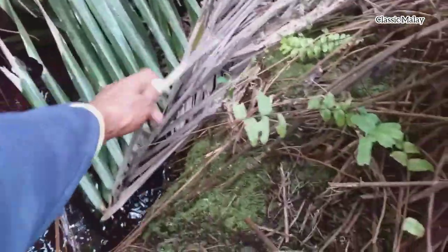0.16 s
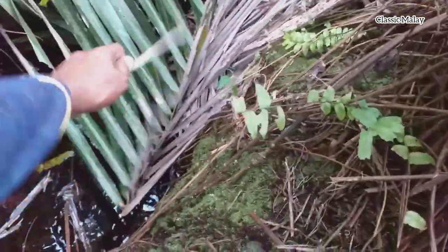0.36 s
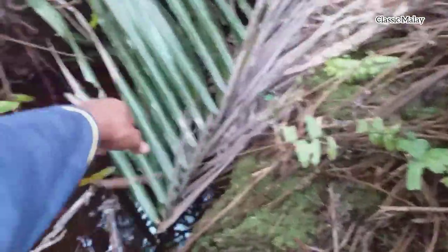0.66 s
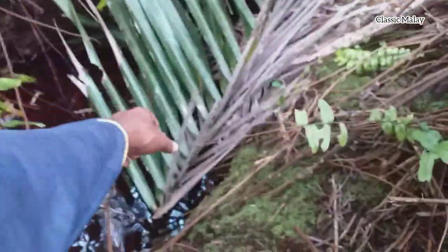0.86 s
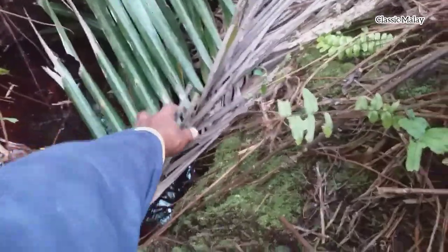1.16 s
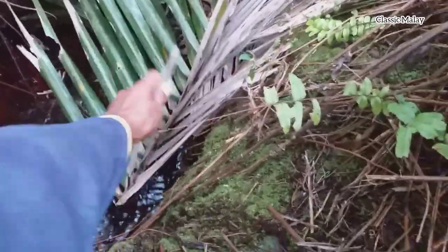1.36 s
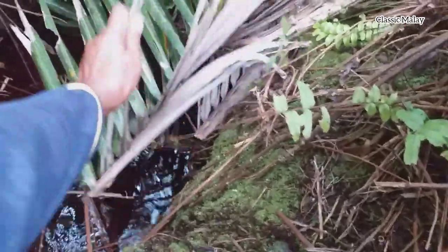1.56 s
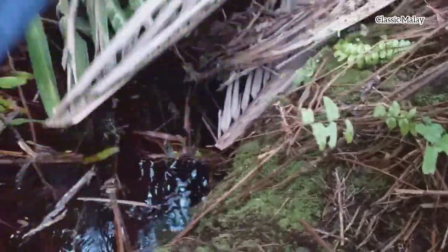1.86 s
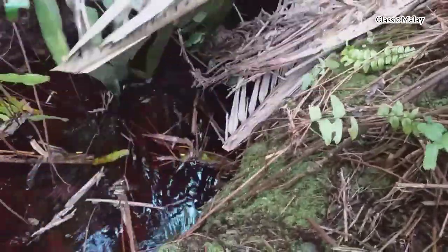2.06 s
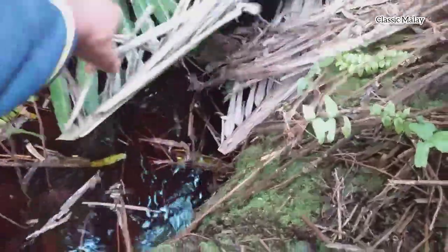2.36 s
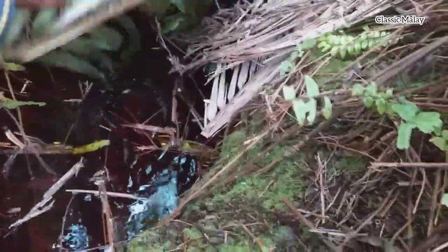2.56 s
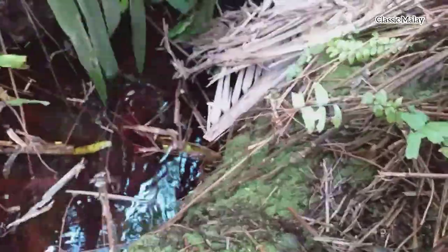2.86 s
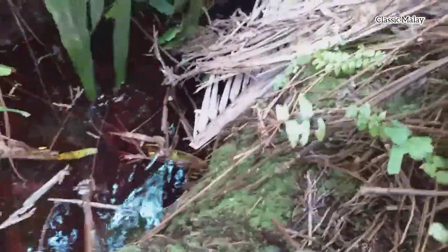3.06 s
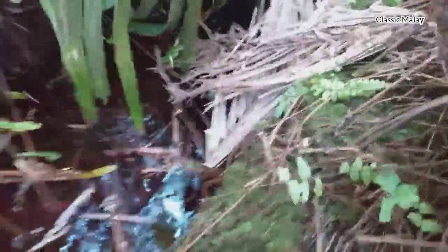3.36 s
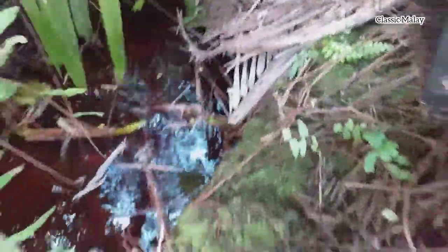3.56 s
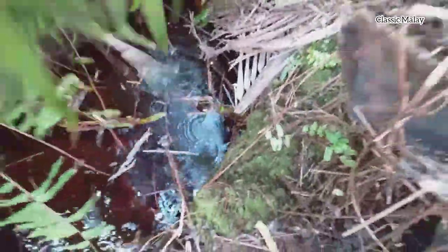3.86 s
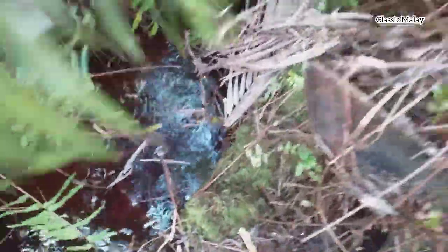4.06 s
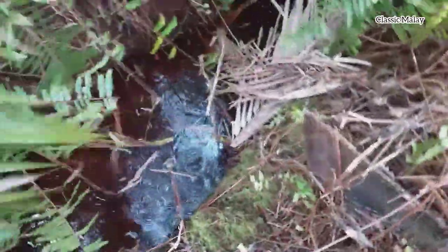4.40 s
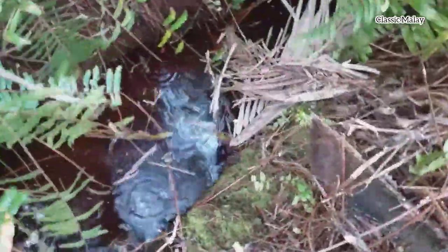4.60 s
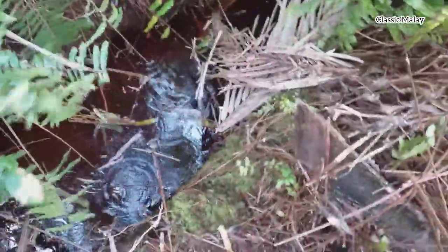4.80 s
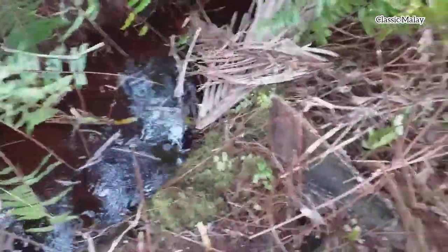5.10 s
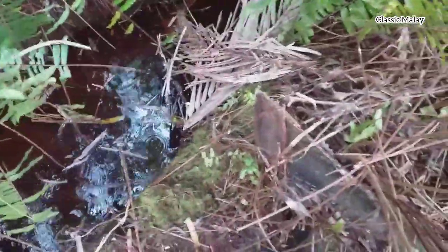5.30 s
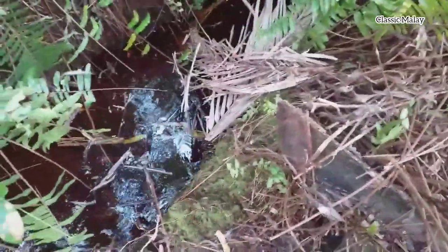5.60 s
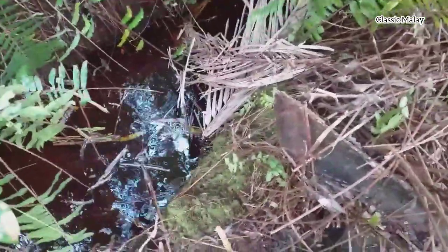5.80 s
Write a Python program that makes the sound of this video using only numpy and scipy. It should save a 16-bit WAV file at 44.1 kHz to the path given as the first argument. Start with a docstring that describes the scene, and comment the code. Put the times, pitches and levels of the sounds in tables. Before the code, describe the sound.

Brittle crackling and sharp snaps from a tugged dry frond, two dull thuds, a quiet pause, then dense leafy rustling with twig ticks outdoors.

```python
"""A palm frond is pulled by hand off a fish trap in a ditch: dry leaflets crinkle by stick-slip and snap as
decaying noise with short resonances, and the stalk thuds twice as damped low sines with hollow knocks.
The frond is then swept through ferns on the bank: dense random contacts merge into a long rustle, with
a few twig ticks and dull stalk scrapes, each a broad resonance. The open air is quiet, shaped noise with
a faint, steady band of insects; one close microphone filters the sum."""
import sys
import numpy as np
from scipy import signal
from scipy.fft import rfft, irfft, next_fast_len
from scipy.io import wavfile

SR = 44100
rng = np.random.default_rng(int(sys.argv[2]) if len(sys.argv) > 2 else 0)


def to_wav(s):
    """Save 16-bit WAV."""
    ch = np.atleast_2d(s).T  # columns
    pcm = np.round(np.clip(ch, -1, 1) * 32767)  # PCM
    wavfile.write(sys.argv[1], SR, pcm.astype(np.int16))


N = 262020
TIME = np.arange(N) / SR

# quiet outdoor background, relative spectrum: frequency_hz, density_db
AIR_COLOUR = [(15, -31), (25, -13), (43, -8), (105, 3.5), (641, -29), (1190, -10), (2550, -5.5),
              (2840, -16), (3720, -20), (4600, -10), (7110, -4), (9320, -19), (13600, -4.5), (16000, -9)]
AIR_DB = -68  # mean level, about which it wavers
# a faint, steady chorus of insects: centre_hz, width_hz, level_db
INSECTS = (7250, 330, -72)
# twigs and ribs tapping: start_s, peak_level_db, pitch_hz
TWIG_TAPS = [(0.186, -37, 410), (0.983, -44, 1620), (2.417, -36, 1400), (4.176, -16.5, 4800),
             (4.4252, -12.5, 5200), (4.438, -16, 1770), (4.611, -15.5, 2430), (4.819, -21.5, 3060),
             (4.894, -20.5, 5060), (4.965, -21, 4600), (5.4215, -23.5, 1980), (5.886, -29, 6300),
             (5.907, -29, 6140)]
# the stalk scraping with a dull, hollow sound: centre_s, level_db, length_s (to 1/e on either side), pitch_hz
STALK_SCRAPES = [(0.03, -57, 0.067, 500), (0.22, -53, .035, 430), (1.02, -70, .1, 378),
                 (1.729, -51.5, 0.027, 229), (3.313, -56.5, .05, 300), (5.548, -49, .035, 480)]
# the stalk knocking free: start_s, swing_level_db, pitch_hz, hollow_knock_db
STALK_THUDS = [(1.905, -28, 65, -34.5), (2.068, -38, 75, -36.5)]

# force of the frond brushing through the ferns, as the level of the leaves: time_s, level_db
SWEEP_FORCE = [(3.22, -53), (3.3, -45), (3.42, -42.5), (3.54, -38), (3.73, -39), (3.94, -36), (4.03, -39.5),
               (4.13, -33), (4.3, -34), (4.43, -29.5), (4.72, -36), (4.82, -39.5), (5.04, -41.5),
               (5.32, -46), (5.55, -39), (5.69, -44), (5.83, -51), (5.93, -48)]
# filter for fern contacts: frequency_hz, gain_db
SWEEP_COLOUR = [(35, -48), (60, -15), (315, -10), (579, -9), (803, -8), (1250, -7), (1680, -3.1),
                (2400, -6.3), (3850, -4.5), (4970, -0.5), (7940, -3), (9350, -6.5), (14900, -8),
                (16000, -7.5)]
# the fern leaves that rub most: time_s, resonance_hz
FERN_PITCH = [(3.2, 4670), (3.55, 7300), (3.95, 7450), (4.15, 5400), (4.5, 5700), (4.9, 5200), (5.35, 5050),
              (5.55, 6900), (5.9, 6400)]
SWEEP_START_S, SWAY_DB = 3.15, -67.5  # the frond enters the ferns; low rumble of the swaying plants
STALK_RUB_DB, TIP_HISS_DB = -5.7, 2  # stalk and fine tips, relative to the leaves, until the ferns settle
# the ferns spring back: change of hiss and of rubbing
SETTLE_S, SETTLE_HISS_DB, SETTLE_RUB_DB = 4.78, -2, -1
REST_S, REST_RUB_DB_PER_S = 5.55, 14  # the stalk comes to rest and its rubbing fades

# tugs of the hand, each swelling and dying away: peak_s, level_db, rise_db_per_s, fall_db_per_s,
# rib_db (rubbing ribs relative to the leaflets)
TUGS = [(0.12, -41, 25, 44, -7), (0.88, -61, 98, 50, -9.5), (1.34, -45.5, 135, 9, -11.5),
        (1.8, -37.5, 43, 50, -10), (2.28, -42.5, 70, 280, -18.5), (2.63, -57.5, 120, 65, -15),
        (3.03, -54.5, 240, 40, -15), (3.22, -48, 80, 50, -6)]
# filter for leaflet contacts: frequency_hz, gain_db
PULL_COLOUR = [(88, -72), (150, -9), (504, -15), (774, -9.5), (1210, -8), (1500, -2.5), (2100, -12.5),
               (3100, -7), (4410, -3), (5050, -3), (6140, -5.5), (7770, -2), (8900, -8), (15100, -4),
               (16000, -12)]
HOLD_DB = -69  # leaflets stirring between tugs
# rumble relative to the rubbing ribs; steady rumble of the frond against the trap
RUMBLE_DB, TRAP_DB = -14, -76.5
FREE_S, FREE_DROP_DB = 2.44, -10.5  # the frond leaves the trap and both rumbles drop

# dry leaflets snapping: start_s, level_db (before SNAP_GAIN_DB), resonance_hz, crack_t60_s
LEAFLET_SNAPS = [(0.0548, -16.5, 7740, .022), (0.087, -5, 7150, .017), (0.105, -2, 6740, 0.011),
                 (0.112, -9.5, 6800, 0.019), (0.177, -7, 3700, 0.08), (0.190, -3, 8500, 0.015),
                 (0.212, -18, 3970, .051), (0.251, -18.5, 7780, .06), (0.411, -14.5, 6900, .04),
                 (0.51, -26, 8450, .027), (0.528, -25, 6150, .022), (0.594, -32, 5780, 0.033),
                 (0.664, -34, 4910, .025), (0.707, -23.5, 6960, 0.088), (0.749, -29.5, 7100, .031),
                 (1.2107, -20.5, 4700, .034), (1.304, -25, 4580, 0.032), (1.32, -17, 5800, 0.027),
                 (1.428, -5, 5100, 0.019), (1.4805, -19.5, 7360, .035), (1.531, -5, 8000, .031),
                 (1.6453, -0.5, 7000, 0.02), (1.693, -6.5, 7700, 0.067), (1.702, -4.5, 7150, .067),
                 (1.7128, -7.5, 5500, 0.048), (1.7567, -6, 5290, 0.088), (1.763, -7.5, 5130, .02),
                 (1.7904, -8, 7650, .029), (1.8155, -8, 4440, 0.023), (1.902, -4.5, 7400, 0.015),
                 (1.9104, -9.5, 6500, 0.066), (1.945, -17.5, 6560, .025), (2.04, -14.5, 8000, 0.058),
                 (2.0672, 4, 4200, 0.028), (2.105, -19.5, 7870, .025), (2.151, -8.5, 6800, 0.052),
                 (2.351, -20, 4800, 0.028), (2.38, -24, 7540, 0.022), (2.417, -20, 5010, 0.024),
                 (2.4627, -13, 5660, .035), (2.65, -18.5, 4400, 0.084), (2.724, -25.5, 7500, .056),
                 (2.779, -35, 6460, .02), (2.85, -32.5, 3680, 0.023), (2.876, -32.5, 5630, .025),
                 (2.973, -28.5, 6700, .014), (2.988, -24.5, 5000, 0.13), (3.037, -29, 4340, .02),
                 (3.161, -27, 8440, .015), (3.17, -20, 8100, .05), (3.278, -16.5, 2820, 0.056),
                 (3.389, -14.5, 8010, 0.036), (5.147, -17.5, 6370, 0.038), (5.193, -11.5, 5000, 0.027),
                 (5.736, -23.5, 7190, .025)]
# filter for the cracks: frequency_hz, gain_db
SNAP_COLOUR = [(120, -16), (200, -17.5), (440, -30), (760, -18.5), (1450, -19.5), (2610, -9.5), (4430, 3),
               (5230, 3), (7970, 2), (9400, -1.5), (10100, 1.5), (11100, -1), (12600, 1), (16000, -4)]
SNAP_GAIN_DB = 8  # common gain of all snaps and lesser cracks
# woody ring of the rib under a 0 dB snap; it grows more slowly than the crack, so soft snaps sound woodier
RIB_DB, RIB_DB_PER_DB = -23.5, .69
# lesser cracks while the frond is handled: level over the sliding leaflets before SNAP_GAIN_DB, and spread
CRACKS_PER_S, CRACK_DB, CRACK_SPREAD_DB, CRACK_T60_S = 14, 13, 5, .018

# microphone resonances: centre_hz, width_hz, gain_db
MIC_PORT = [(1760, 290, 1.5), (5460, 480, -0.5), (7930, 610, 4.5), (9070, 2660, -5), (15000, 1000, 3.5)]
BASS_CUT_HZ, TOP_HZ = 42, 15750


def undb(db):
    """Convert decibels to an amplitude ratio: 20 dB per factor of ten."""
    return np.exp(np.asarray(db) * (np.log(10) / 20))


def unit(x):
    """Normalise the mean power, giving an rms of 1."""
    return x / np.sqrt(np.mean(x ** 2) + 1e-18)


def curves(table):
    """Interpolate each column linearly against the first, which is time."""
    s, *columns = np.transpose(table)
    return [np.interp(TIME, s, column) for column in columns]


def after(s, ramp_s):
    """Linear transition from 0 to 1, centred on a moment."""
    return np.clip((TIME - s) / ramp_s + .5, 0, 1)


def walk(rate):
    """Random modulation: normal values of spread 1, rate per second, joined by straight lines."""
    knots = rng.standard_normal(8192)
    return np.interp(TIME * rate, np.arange(len(knots)), knots)


def band(x, lo_hz, hi_hz):
    """Band-pass by the difference of two soft low-passes, so that neighbouring bands add up flat."""
    size = next_fast_len(len(x), True)
    hz6 = (np.arange(size // 2 + 1) * SR / size) ** 6
    below_hi = 1 / (1 + hz6 / float(hi_hz) ** 6)
    below_lo = 1 / (1 + hz6 / float(lo_hz) ** 6)
    return irfft(rfft(x, size) * (below_hi - below_lo), size)[:len(x)]


def ring(x, hz, width_hz):
    """A single damped resonator, of gain 1 at its centre."""
    b, a = signal.iirpeak(hz, hz / width_hz, fs=SR)
    return signal.lfilter(b, a, x)


def colour(x, points, size=2048):
    """Minimum-phase filter: the folded cepstrum makes a magnitude curve causal."""
    hz, db = np.transpose(points)
    grid = np.maximum(np.arange(size // 2 + 1) * SR / size, 1)
    magnitude = undb(np.interp(np.log(grid), np.log(hz), db))
    cepstrum = irfft(np.log(magnitude))
    cepstrum[1:size // 2] *= 2
    cepstrum[size // 2 + 1:] = 0
    impulse = irfft(np.exp(rfft(cepstrum)))
    return signal.fftconvolve(x, impulse)[:len(x)]


def grains(rate, spread_db, cap_db):
    """Random impulses with exponentially spread levels: many faint contacts, a few strong ones."""
    place, strength, side = rng.random((3, int(rate * N / SR)))
    level_db = np.minimum(-spread_db * np.log1p(-strength), cap_db)
    push = undb(level_db) * np.sign(side - .5)
    return unit(np.bincount((place * N).astype(int), push, N))


def scatter(x, t60, tail_db):
    """Energy decay: each contact shakes the neighbouring leaves, whose hiss dies away exponentially."""
    keep = 1e-6 ** (1 / (t60 * SR))
    energy = signal.lfilter([1 - keep], [1, -keep], x ** 2)
    return x + undb(tail_db) * np.sqrt(energy) * rng.standard_normal(N)


def crinkle(rate, spread_db, cap_db, leaf_db, flutter_db, count=6):
    """Impact excitation: broad ticks plus leaflets of many sizes, each ringing at its own pitch in bursts."""
    leaves = 0
    for hz in np.geomspace(1200, 14000, count):
        contacts = grains(rate / count, spread_db, cap_db) * undb(flutter_db * walk(70))
        leaves = leaves + ring(contacts, hz, hz / 2.5)
    ticks = grains(rate, spread_db, cap_db)
    return unit(ticks + undb(leaf_db) * unit(leaves))


def shimmer(x, flicker_db, centre_hz, lift_db, count=10):
    """Independent band modulation: each leaf size flickers, and the size that rubs most lifts its own pitch."""
    edges = np.concatenate([[1], np.geomspace(1100, 13000, count), [SR]])
    out = 0
    for lo, hi in zip(edges, edges[1:]):
        octaves = np.log2(np.sqrt(lo * hi) / centre_hz)
        nearness = np.exp(-(octaves / 0.23) ** 2)
        out = out + band(x, lo, hi) * undb(flicker_db * walk(90) + lift_db * nearness)
    return out


def air():
    """Broadband ambient noise, gently wavering, with a narrow band of noise for insects far off."""
    hz, width_hz, db = INSECTS
    chorus = ring(ring(rng.standard_normal(N), hz, width_hz), hz, width_hz)
    background = unit(colour(rng.standard_normal(N), AIR_COLOUR))
    return unit(chorus) * undb(db) + background * undb(AIR_DB + walk(3.7))


def twigs(size=1500):
    """Heavily damped resonance: a short burst of noise drives one broad, woody ring."""
    out, t = np.zeros(N + size), np.arange(size) / SR
    for s, db, hz in TWIG_TAPS:
        push = rng.standard_normal(size) * undb(-60 * t / 0.014)
        tap = ring(ring(push, hz, .8 * hz), hz, .8 * hz)
        start = int(s * SR)
        out[start:start + size] += undb(db) * tap / np.abs(tap).max()
    return out[:N]


def scrapes():
    """Friction excitation: the rough skin of the dragged stalk shakes one low, broad resonance."""
    out = 0
    for s, db, length_s, hz in STALK_SCRAPES:
        rough_skin = grains(1500, 2.6, 12)
        body = ring(ring(rough_skin, hz, 1.7 * hz), hz, 1.7 * hz)
        out = out + unit(body) * undb(db) * np.exp(-((TIME - s) / length_s) ** 2)
    return out


def thuds():
    """Damped oscillation: the heavy stalk swings for a few cycles and knocks hollowly on the trap."""
    out = 0
    for s, db, hz, knock_db in STALK_THUDS:
        t = np.maximum(TIME - s, 0)
        swing = undb(db - 60 * t / 0.045) * np.sin(2 * np.pi * hz * t)
        hollow = unit(ring(band(rng.standard_normal(N), 80, 330), 140, 140))
        onset = np.minimum(t / 0.0013, 1)
        out = out + swing + hollow * undb(knock_db - 60 * t / 0.042) * onset
    return out


def sweep():
    """Dense random contacts: soft fern tips flick along the frond and merge into a grainy hiss."""
    force_db, = curves(SWEEP_FORCE)
    fern_hz, = curves(FERN_PITCH)
    contacts = scatter(crinkle(6000, 2.57, 13.5, 2.1, 3.1), t60=0.07, tail_db=0.5)
    rustle = colour(contacts * undb(0.43 * walk(70)), SWEEP_COLOUR)
    rustle = shimmer(rustle, 2.0, fern_hz, lift_db=3.0)
    leaves = unit(band(rustle, 2470, 6160))
    stalk = unit(band(rustle, 45, 2350)) * undb(STALK_RUB_DB + SETTLE_RUB_DB * after(SETTLE_S, .2))
    stalk = stalk * undb(-REST_RUB_DB_PER_S * np.maximum(TIME - REST_S, 0))
    hiss = unit(band(rustle, 7360, 19800)) * undb(TIP_HISS_DB + SETTLE_HISS_DB * after(SETTLE_S, 0.16))
    sway = unit(band(rng.standard_normal(N), 47, 480)) * undb(SWAY_DB)
    return ((leaves + stalk + hiss) * undb(force_db) + sway) * after(SWEEP_START_S, 0.11)


def effort():
    """Addition of powers: tugs join the stir of the held frond, giving leaflet and rib levels in dB."""
    leaves, ribs = undb(HOLD_DB) ** 2, 1e-18
    for s, db, rise, fall, rub_db in TUGS:
        drop_db = np.maximum(rise * (s - TIME), fall * (TIME - s))
        power = undb(db - drop_db) ** 2
        leaves = leaves + power
        ribs = ribs + power * undb(rub_db) ** 2
    return 10 * np.log10(leaves), 10 * np.log10(ribs)


def pull():
    """Stick-slip friction: stiff leaflets catch and slip, the ribs rub and the trap rumbles under them."""
    leaf_db, rib_db = effort()
    contacts = scatter(crinkle(700, 4.2, 16.5, 1.5, 4.0), t60=0.075, tail_db=2)
    rustle = colour(contacts * undb(2.34 * walk(45.06)), PULL_COLOUR)
    rustle = shimmer(rustle, 2.7, 4800, lift_db=.6)
    leaves = unit(band(rustle, 2450, 14800)) * undb(leaf_db)
    ribs = unit(band(rustle, 264, 2470)) * undb(rib_db)
    rumble = unit(band(rng.standard_normal(N), 67, 227)) * (undb(rib_db + RUMBLE_DB) + undb(TRAP_DB))
    rumble = rumble * undb(FREE_DROP_DB * after(FREE_S, 0.45))
    return (leaves + ribs + rumble) * (1 - after(SWEEP_START_S, 0.086))


def lesser_cracks():
    """Random fracture: small snaps at random moments, as strong as the hand is pulling."""
    place, strength, pitch = rng.random((3, int(CRACKS_PER_S * SWEEP_START_S)))
    s = place * SWEEP_START_S
    leaf_db, _ = effort()
    db = np.interp(s, TIME, leaf_db) + CRACK_DB + CRACK_SPREAD_DB * (2 * strength - 1)
    return [(at, level, 4000 + 4000 * p, CRACK_T60_S) for at, level, p in zip(s, db, pitch)]


def snap(db, hz, t60, size, lead_size):
    """Brittle fracture: a fibre strains and breaks, smaller cracks run on, leaflet and rib ring briefly."""
    t = np.arange(size - lead_size) / SR
    lead_t = np.arange(-lead_size, 0) / SR
    creak = undb(-14.5) * np.exp(lead_t / (.06 * t60))  # long tears creak longer
    split = undb(-60 * t / t60)
    click = .5 * np.exp(-t / 0.00043)
    shaking_leaves = undb(-17.5 - 60 * t / 0.11)
    fade = np.concatenate([creak, split + click + shaking_leaves])
    fibres = rng.standard_normal(size) * undb(3.0 * rng.standard_normal(size))
    crack = colour(fibres * fade, SNAP_COLOUR)
    crack = crack + 1.1 * ring(crack, hz, 930)
    rib = ring(ring(rng.standard_normal(size) * fade, 1380, 1130), 1450, 1460)
    rib = band(rib, 560, 4000)
    rib_db = RIB_DB + RIB_DB_PER_DB * db
    # both parts are scaled to unit energy before their levels apply
    return undb(db) * crack / np.linalg.norm(crack) + undb(rib_db) * rib / np.linalg.norm(rib)


def snaps(size=6000, lead_size=400):
    """Superposition of fractures: the listed snaps with the lesser cracks among them."""
    out = np.zeros(N + size)
    for s, db, hz, t60 in LEAFLET_SNAPS + lesser_cracks():
        start = max(int(s * SR) - lead_size, 0)  # the creak leads the break
        out[start:start + size] += snap(db, hz, t60, size, lead_size)
    return undb(SNAP_GAIN_DB) * out[:N]


def scene():
    """Linear superposition of all sources at one microphone, the same in both channels."""
    background = air()
    stalk = twigs() + scrapes() + thuds()
    frond = sweep() + pull() + snaps()
    return np.tile(background + stalk + frond, (2, 1))


def record(dry):
    """Resonance and band limits: the microphone port colours the treble; deepest bass and top are cut."""
    for hz, width_hz, db in MIC_PORT:
        dry = dry + (undb(db) - 1) * ring(dry, hz, width_hz)
    dry = signal.sosfilt(signal.butter(2, BASS_CUT_HZ, "high", fs=SR, output="sos"), dry)
    return signal.sosfilt(signal.ellip(10, .2, 70, TOP_HZ, fs=SR, output="sos"), dry)


dry = scene()
out = record(dry)
to_wav(out)
```